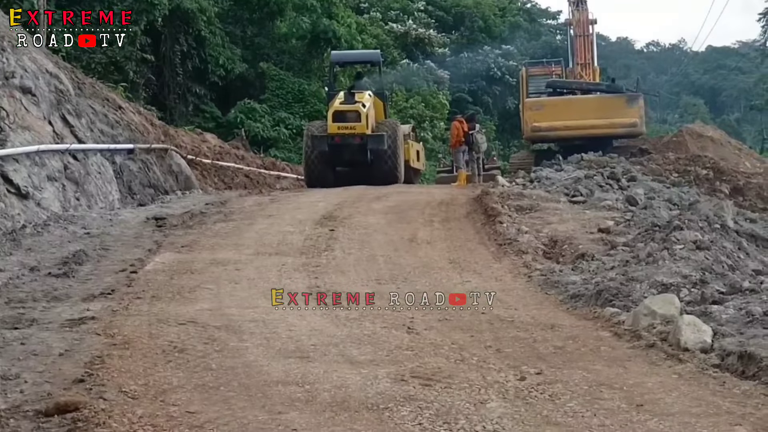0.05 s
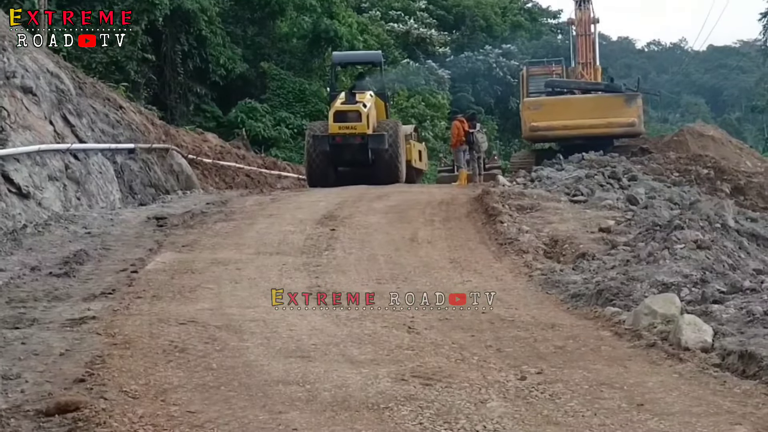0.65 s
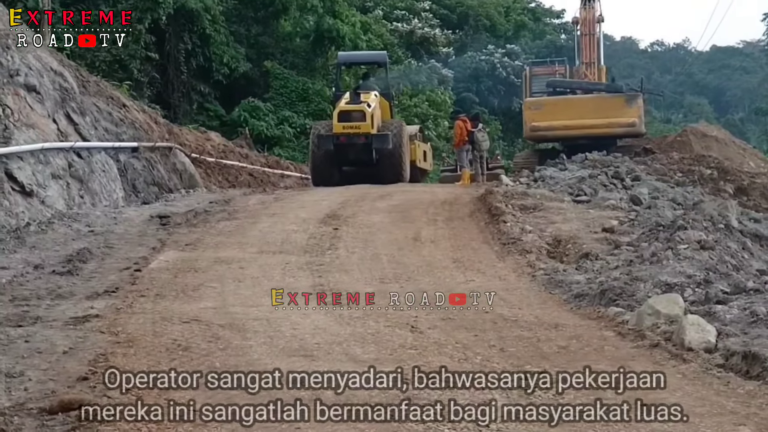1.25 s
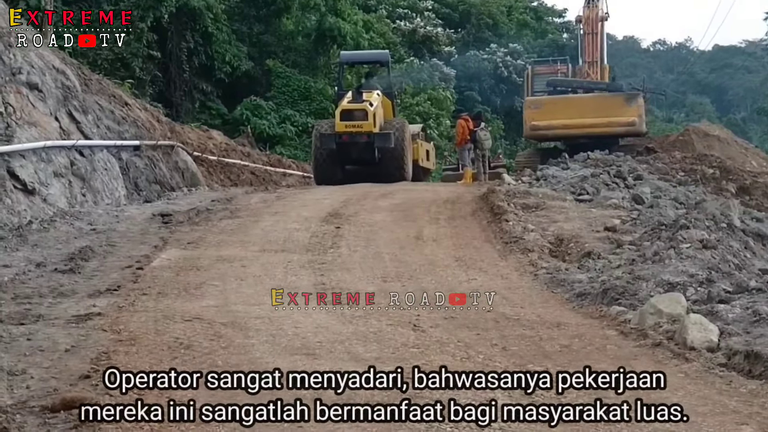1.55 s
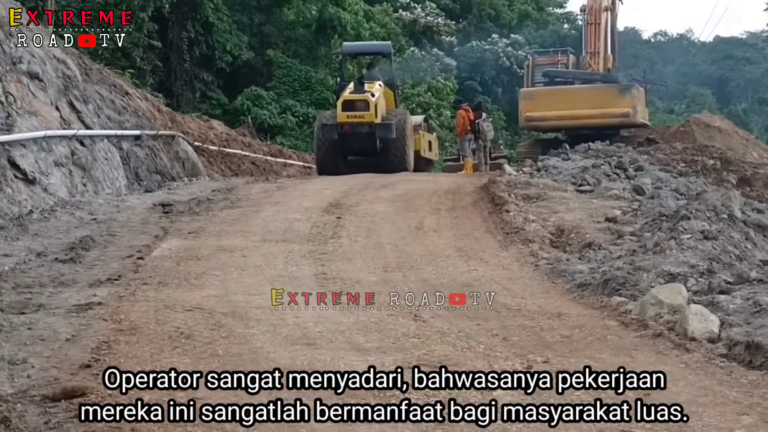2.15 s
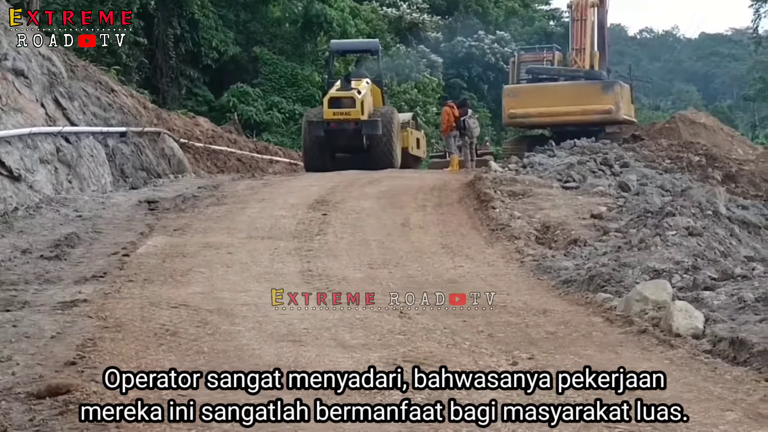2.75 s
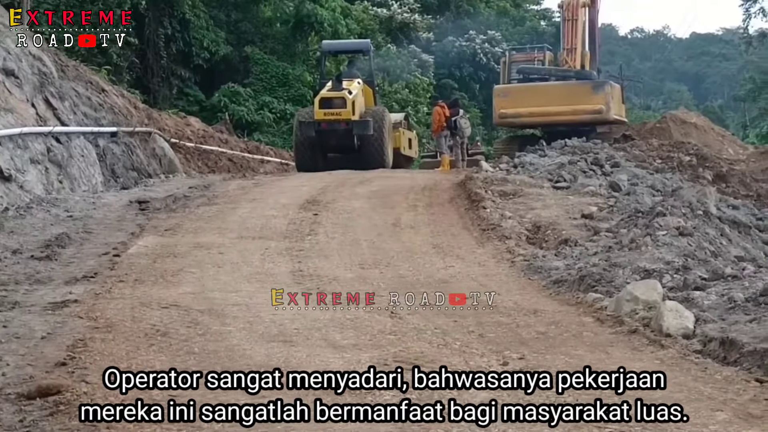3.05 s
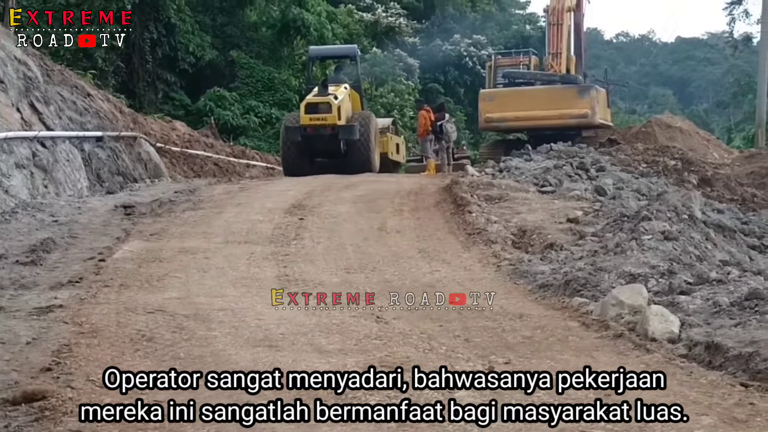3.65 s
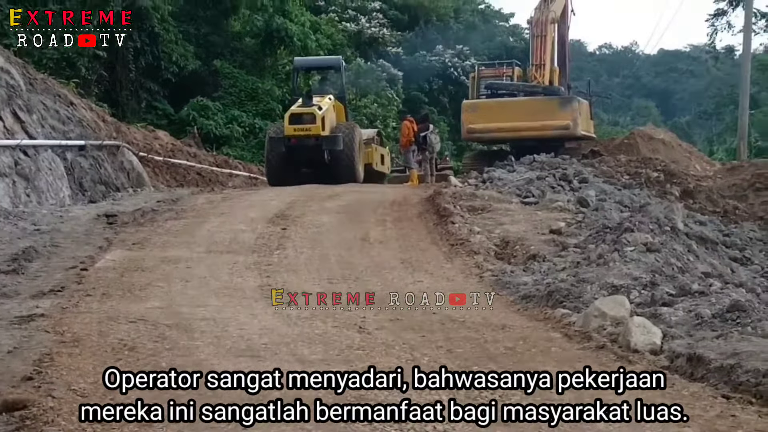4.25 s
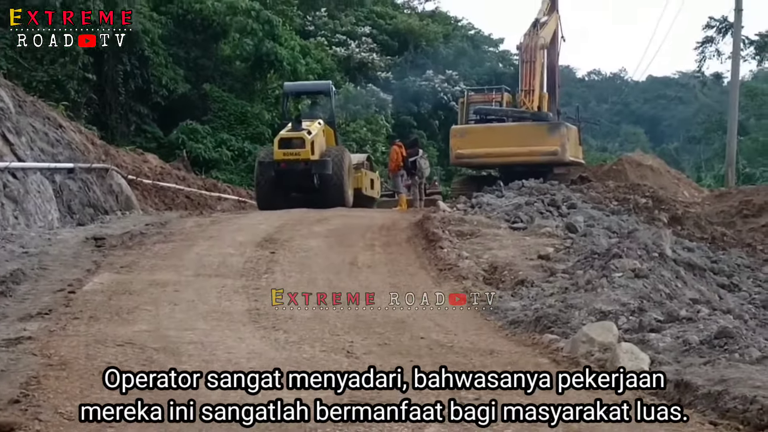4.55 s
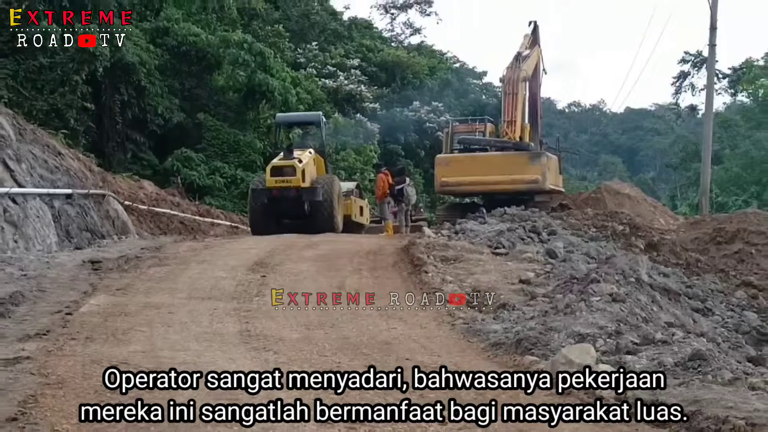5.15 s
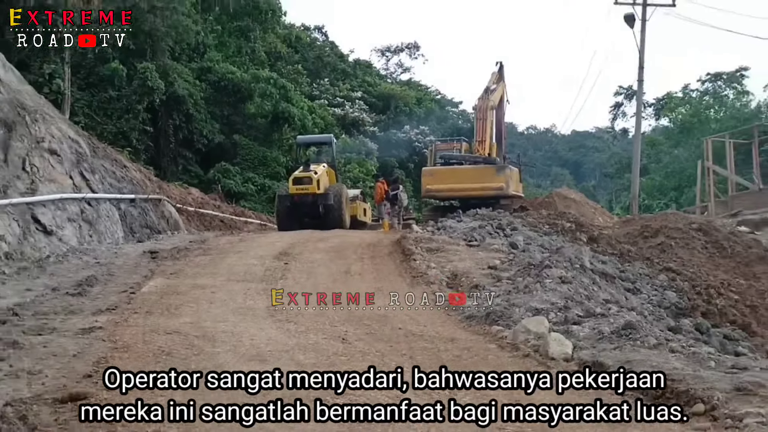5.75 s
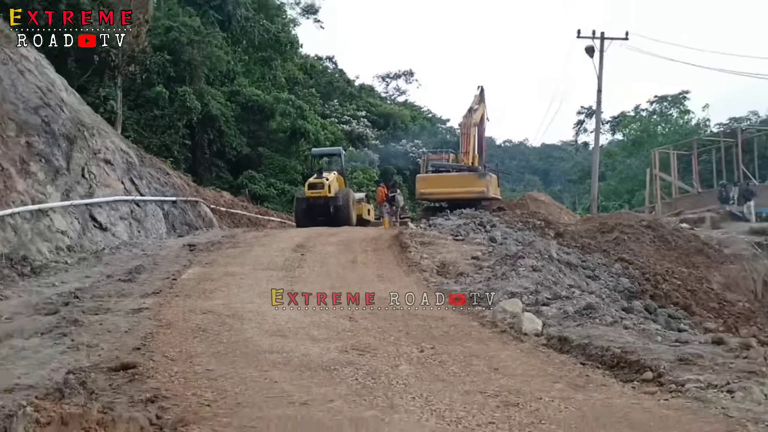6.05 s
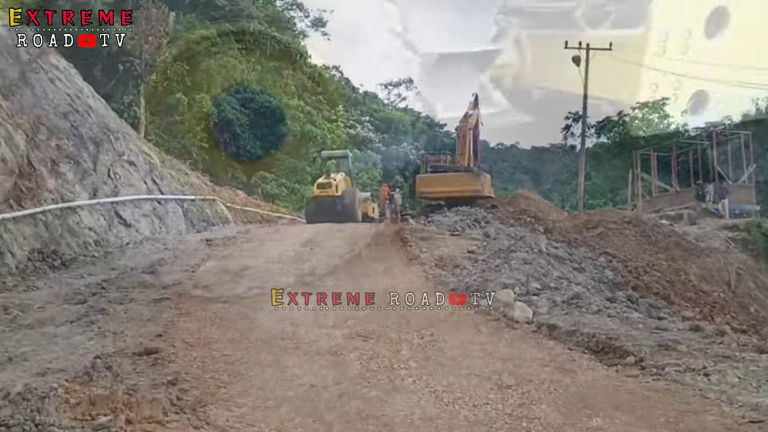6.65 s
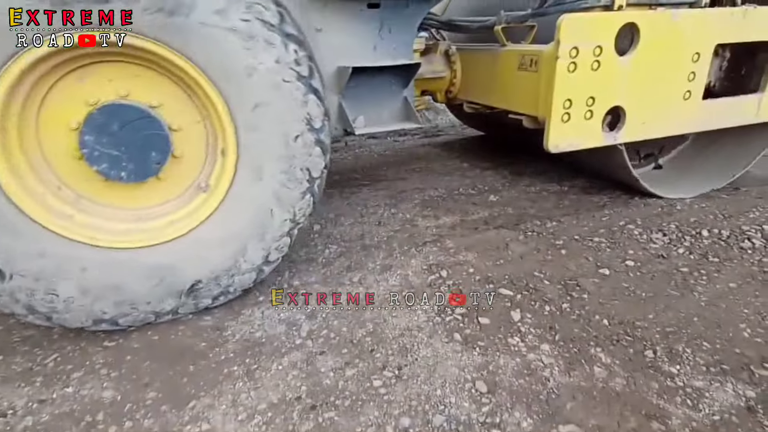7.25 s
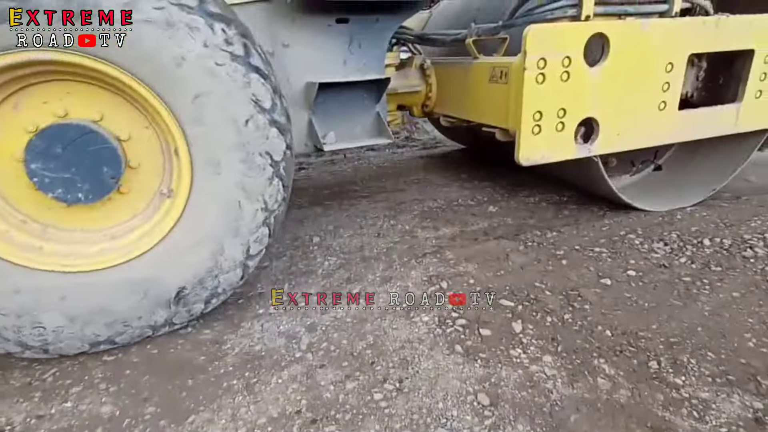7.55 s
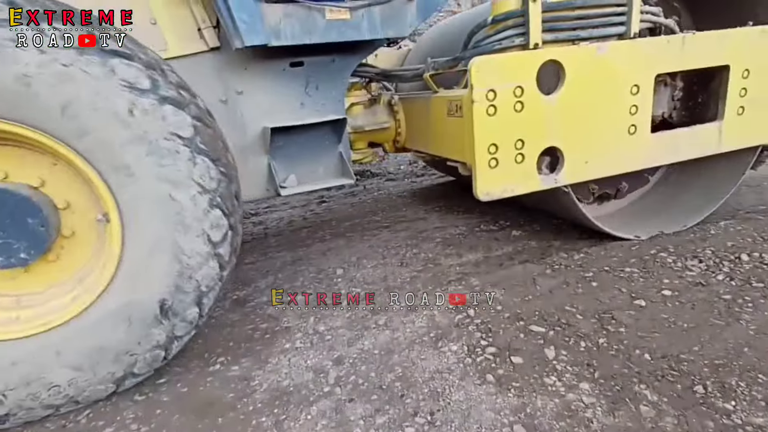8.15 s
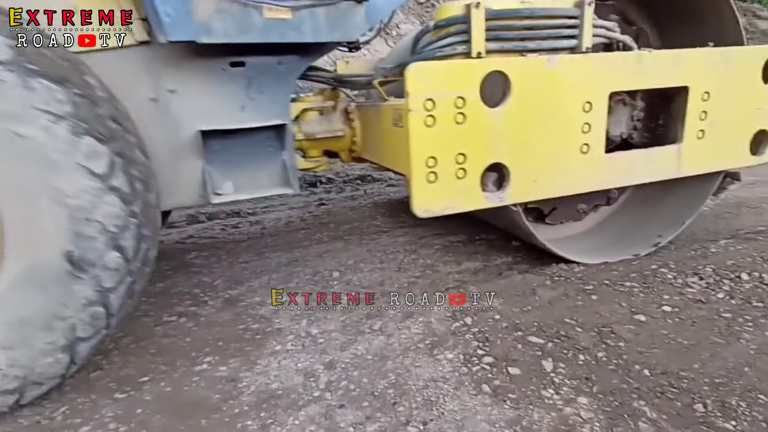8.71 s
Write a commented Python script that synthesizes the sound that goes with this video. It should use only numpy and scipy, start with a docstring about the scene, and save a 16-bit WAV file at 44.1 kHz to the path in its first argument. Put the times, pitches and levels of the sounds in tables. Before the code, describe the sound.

From the start, the diesel engines of a road roller and an excavator drone some way off outdoors, a low throbbing hum with light clatter that swells gently a few times in the first four seconds. Small metal clanks come at about 0.6 seconds and several times between 2.8 and 5.3 seconds. From around 3 seconds a light metallic rattle and faint insect trills join, with one insect chirping from roughly 3.8 to 6 seconds. A short dry snap comes near 5.9 seconds. Between about 6.4 and 7.2 seconds the distant sound dissolves into a much louder roller creeping past at arm's length. Its exhaust booms, its panels rumble and its engine clatters, with rushing cooling air, a soft gravel rasp and a faint, wandering high whistle. A dull thud lands near 8 seconds, and the engine stays loud until the end, near 9 seconds.

```python
"""Two diesels drone and beat some way up a dirt road: a four-cylinder roller and a six-cylinder excavator,
with scattered clanks and faint forest insects behind them. The scene dissolves to a steel-drum roller
passing at arm's length. Its periodic firings make the exhaust boom, the panels rumble and the block
clatter, while cooling air rushes, gravel rasps and a thin whistle wanders."""
import sys
import numpy as np
from scipy import signal
from scipy.fft import rfft, irfft, next_fast_len
from scipy.io import wavfile
from scipy.ndimage import uniform_filter1d

SR = 44100
rng = np.random.default_rng(int(sys.argv[2]) if len(sys.argv) > 2 else 0)


def file_out(sig):
    """Save sig as 16-bit WAV at sys.argv[1]."""
    # one column per channel
    cols = np.atleast_2d(sig).T
    # limit, then scale
    lim = np.clip(cols, -1, 1)
    pcm = np.round(lim * 32767).astype(np.int16)
    wavfile.write(sys.argv[1], SR, pcm)


N = 387182
TIME = np.arange(N) / SR

# insect trills (frequency [Hz], bandwidth [Hz], level [dB])
INSECT_TRILLS = [(4700, 120, -70), (6120, 60, -69), (6630, 30, -67)]
# one insect's chirps (time [s], level [dB])
INSECT_CHIRPS = [(3.776, -53), (3.925, -55.5), (4.075, -57.5), (4.22, -56), (4.37, -56.5), (4.515, -60),
                 (4.66, -60), (4.96, -55), (5.11, -54.5), (5.25, -57), (5.4, -52), (5.7, -58),
                 (5.98, -57.5)]

# engine speeds (time [s], firing rate [Hz])
FAR_ROLLER_FIRING = [(0, 56.55), (1.3, 56.53), (1.9, 56.38), (2.7, 55.98), (3.3, 56.25), (4.4, 56.4),
                     (5.2, 56.55), (5.9, 56.8), (6.8, 56.6)]
EXCAVATOR_FIRING = [(0, 82.88), (2.6, 82.98), (5.6, 83.0), (6.1, 83.3)]
CLOSE_FIRING = [(7.0, 63.12), (8.4, 63.22), (8.7, 63.45)]
# surges of the distant roller's overtones (start [s], end [s], boost [dB])
LOAD_SURGES = [(-.2, .95, 3.5), (1.55, 2.72, 6.3), (3.08, 3.95, 5)]
# its exhaust harmonics (order [x cycle rate], level [dB], gain with slowing [dB/Hz], surge share [1])
FAR_ROLLER_HARMONICS = [(4, -35.7, 0, 0), (8, -33.2, 2.6, .08), (10, -48.5, 0, 0), (12, -36.4, 0, .9),
                        (14, -46, 0, .2), (15, -47.5, 0, .3), (16, -45, 1.5, .7), (18, -51, 0, .2),
                        (20, -52.5, 2, .5), (25, -55, 0, 0), (32, -55, 0, 0)]
# excavator's exhaust and gear harmonics (order [x cycle rate], level [dB])
EXCAVATOR_HARMONICS = {6: -39, 9: -50, 12: -40.8, 36: -56, 54: -61, 84: -65, 98: -63, 110: -63.5, 115:
                       -59.5, 126: -60, 128: -65, 144: -61.5, 156: -66, 180: -65}
# noise spectra of the distant site (frequency [Hz], relative density [dB])
FAR_RUMBLE_SPECTRUM = [(20, -32), (40, -9), (60, 1), (100, 3), (140, 7), (165, 3.8), (200, 3), (245, -4),
                       (300, -6), (400, -18), (700, -43)]
FAR_CLATTER_SPECTRUM = [(150, -44), (330, -2.5), (540, 1.5), (700, -3.5), (950, -3), (1160, -7.5),
                        (1380, -4.5), (1800, -6.5), (2300, -11), (3200, -17), (7000, -25), (9000, -38.5)]
FAR_HISS_SPECTRUM = [(1000, 0.5), (3000, 3), (4700, 5.5), (6450, 7), (7000, -0.5), (8700, -11), (9500, -15),
                     (10200, -6), (11800, -6.5), (12800, -12), (14000, -29)]

# distant clanks (time [s], ring level [dB], plate level [dB], clack level [dB])
FAR_CLANKS = [(.625, -59, -48.5, -35.7), (2.765, -61, -54, -45), (3.266, -66, -53, -41.5),
              (3.758, -52.5, -45, -38), (4.246, -52.5, -41, -39.5), (5.305, -61, -56, -53)]
# resonances of every clank (frequency [Hz], bandwidth [Hz], decay [s])
CLANK_RING, CLANK_PLATE, CLANK_CLACK = (11350, 900, .03), (1760, 170, .045), (1100, 1500, .03)
# a dry snap (time [s], onset level [dB], frequency [Hz], bandwidth [Hz], decay [s])
DRY_SNAP = (5.8655, -31.3, 3900, 5600, .0018)
# a thud from the close roller (time [s], envelope peak [dB], frequency [Hz], length [s])
PANEL_THUD = (7.9535, -15.5, 400, .009)

# close roller's parts, by name (time abreast [s], nearest distance [m], level there [dB])
PASSING_PARTS = { "cooler": (7.44, 0.35, -40.5), "gears": (7.95, 1.3, -36.5), "block": (8.52, 1, -35.5),
                 "tyre": (8.36, 0.22, -42), "panels": (8, 1.66, -26.5), "exhaust": (8.6, 1.17, -23.5),
                 "drum": (7.8, 1.0, -47.5), }
# its whistle (time [s], frequency [Hz], level [dB])
WHISTLE_PATH = [(6.7, 8620, -65), (7.15, 8700, -68), (7.38, 9420, -66), (7.55, 9300, -62), (7.8, 8750, -62),
                (8.02, 8680, -64), (8.15, 9000, -64), (8.28, 9600, -64), (8.4, 10050, -59),
                (8.78, 10700, -58.5)]
# a brief sizzle of fine grit (start [s], rise [s], end [s], fall [s])
SIZZLE_ENVELOPE = (7.2, .55, 7.95, .15)
# close roller's harmonics (order [x cycle rate], relative level [dB])
GEAR_HARMONICS = {23: -38, 36: -50, 38: -48.5, 40: -50, 42: -46, 44: -47.5, 48: -42.5, 49: -49, 52: -51, 58:
                  -45.5, 108: -52, 110: -54, 156: -55}
CLOSE_EXHAUST_HARMONICS = {3: -48, 4: -24.7, 8: -41, 13: -45, 16: -34.8, 17: -35.8, 19: -41.5, 20: -42.5}
# its noise spectra (frequency [Hz], relative density [dB])
GRIT_SPECTRUM = [(3000, -2), (8000, -0.5), (9700, -2), (11000, 2.5), (12300, 4.5), (14000, -0.5)]
TYRE_SPECTRUM = [(1000, -20), (2000, -0.5), (2500, -1), (3200, 0.5), (3900, -15), (8000, -40)]
COOLER_SPECTRUM = [(2000, -23), (3650, 2), (4200, 0.5), (5000, 5), (5600, 2), (6300, 1.5), (7200, -10),
                   (8300, -31), (11000, -27)]
BLOCK_SPECTRUM = [(500, -2.5), (1220, 7), (1450, 5), (1720, 6), (2150, 1), (2480, 2.5), (3200, -4.5),
                  (4100, -6.5), (4700, -7.5), (7200, -11), (14000, -35)]
PANEL_SPECTRUM = [(20, -32), (60, -9), (120, -1.8), (175, -.7), (260, 0), (370, -4.5), (480, -10.5),
                  (550, -12), (640, -9), (770, -5), (830, -7.5), (880, -11), (1060, -12.5), (1170, -19),
                  (1600, -30), (8000, -70)]

CREEP_M_PER_S = 0.76


def undb(db):
    """Amplitude ratio: tenfold for every 20 dB."""
    return 10 ** (np.asarray(db) / 20)


def unit(x):
    """Normalisation to rms 1."""
    return x / np.sqrt(np.mean(x ** 2))


def curves(table):
    """Linear interpolation of each column over time."""
    times, *columns = np.transpose(table)
    return [np.interp(TIME, times, column) for column in columns]


def noise():
    """White noise: equal power per hertz."""
    return rng.standard_normal(N)


def drift(rate_hz):
    """Low-pass random fluctuation of spread near 1."""
    hold = max(int(SR / rate_hz), 1)
    steps = np.repeat(rng.standard_normal(N // hold + 1), hold)
    return 1.3 * uniform_filter1d(uniform_filter1d(steps, hold), hold)[:N]


def swell(start_s, rise_s, end_s, fall_s):
    """Trapezoidal envelope, silent outside start_s to end_s."""
    return np.clip(np.minimum((TIME - start_s) / rise_s, (end_s - TIME) / fall_s), 0, 1)


def fade_in(start_s, rise_s):
    """Linear amplitude ramp from 0 to 1."""
    return np.clip((TIME - start_s) / rise_s, 0, 1)


def bump(centre_s, length_s):
    """Raised-cosine envelope."""
    return np.cos(np.pi * np.clip((TIME - centre_s) / length_s, -.5, .5)) ** 2


def colour(x, spectrum):
    """Spectral shaping by a gain curve over log frequency; rms 1."""
    size = next_fast_len(N)
    hz, db = np.transpose(spectrum)
    bins = np.maximum(np.fft.rfftfreq(size, 1 / SR), 1)
    gain = undb(np.interp(np.log(bins), np.log(hz), db))
    return unit(irfft(rfft(x, size) * gain, size)[:N])


def resonate(x, hz, width_hz):
    """Two equal resonators in cascade, for steep skirts; rms 1."""
    b, a = signal.iirpeak(hz, hz / width_hz, fs=SR)
    return unit(signal.lfilter(b, a, signal.lfilter(b, a, x)))


def crank(firing_hz, hunt, cylinders):
    """Phase is the integral of rate: four-stroke cycles turned as the governor hunts a little."""
    return np.cumsum(firing_hz / cylinders * (1 + hunt * drift(6))) / SR


def harmonics(cycles, levels, waver_db):
    """Fourier series of the engine cycle; upper orders waver more on their way through the air."""
    out = 0
    for order, db in levels.items():
        exposure = min(order / 20, 1)
        phase = 2 * np.pi * order * cycles + 0.3 * exposure * drift(6)
        amplitude = np.sqrt(2) * undb(db + exposure * waver_db * drift(6.3))
        out = out + amplitude * np.cos(phase)
    return out


def knocks(cycles, repeat, depth, cylinders):
    """Cyclostationary noise: valves and injectors repeat each cycle, and each firing adds a burst."""
    samples_per_cycle = N / cycles[-1]
    repeating = noise()[(cycles % 1 * samples_per_cycle).astype(int)]
    bursts = 1 + depth * np.cos(2 * np.pi * cylinders * cycles)
    return bursts * (np.sqrt(repeat) * repeating + np.sqrt(1 - repeat) * noise())


def muffler(x, hz, width_hz):
    """All-pass dispersion: the chamber stores each pulse and lets it out late, smearing the chug."""
    return x - 2 * signal.lfilter(*signal.iirpeak(hz, hz / width_hz, fs=SR), x)


def passing(part):
    """Spherical spreading: a part's amplitude goes as 1 / distance while it creeps past."""
    abreast_s, nearest_m, db = PASSING_PARTS[part]
    distance_m = np.hypot(nearest_m, CREEP_M_PER_S * (TIME - abreast_s))
    return undb(db) * nearest_m / distance_m


def insects():
    """Narrow-band calls: one insect chirps on a rough pitch; others hold trills and a high buzz."""
    chirp_hz = 4690 * (1 + .013 * drift(400))
    tone = np.sqrt(2) * np.sin(2 * np.pi * np.cumsum(chirp_hz) / SR)
    chirps = tone * sum(undb(db) * bump(s, length_s=.06) for s, db in INSECT_CHIRPS)
    trills = sum(resonate(noise(), hz, width) * undb(db + 2.7 * drift(3.43))
                 for hz, width, db in INSECT_TRILLS)
    buzz = resonate(noise(), hz=10500, width_hz=3000) * undb(-63.3)
    return chirps + fade_in(start_s=2.4, rise_s=1.3) * (trills + buzz)


def distant_hiss():
    """Broadband noise of the site, its level fluttering slightly."""
    return colour(noise(), FAR_HISS_SPECTRUM) * undb(-49.5 + 0.82 * drift(25.06))


def loose_covers():
    """Randomly driven resonance: loose steel covers begin to rattle."""
    rattle = resonate(noise(), hz=1980, width_hz=900) * undb(-52.5 + 2.0 * drift(60))
    return rattle * fade_in(start_s=2.8, rise_s=.8)


def distant_diesels():
    """Beating: the roller's third firing harmonic lies a few hertz from the excavator's second."""
    firing_hz = curves(FAR_ROLLER_FIRING)[0]
    roller = crank(firing_hz, hunt=.0004, cylinders=4)
    excavator = crank(curves(EXCAVATOR_FIRING)[0], hunt=.0001, cylinders=6)
    # load drags the speed down and sharpens the pulses: overtones grow while the fundamental holds
    surge_db = sum(db * swell(start, 0.28, end, 0.31) for start, end, db in LOAD_SURGES)
    droop_hz = firing_hz.mean() - firing_hz
    levels = {order: db + per_hz * droop_hz + share * surge_db
              for order, db, per_hz, share in FAR_ROLLER_HARMONICS}
    exhausts = muffler(harmonics(roller, levels, waver_db=1.1), hz=169, width_hz=120)
    exhausts += harmonics(excavator, EXCAVATOR_HARMONICS, waver_db=1.6)
    chug = knocks(roller, repeat=0.1, depth=0.25, cylinders=4)
    rumble = colour(chug, FAR_RUMBLE_SPECTRUM) * undb(-35 + 0.16 * surge_db + 0.9 * drift(9))
    knocking = knocks(excavator, repeat=0.42, depth=0.07, cylinders=6)
    knocking += 0.91 * knocks(roller, repeat=0.3, depth=0.04, cylinders=4)
    clatter = colour(knocking, FAR_CLATTER_SPECTRUM) * undb(-40.5 + 0.51 * drift(14))
    return exhausts + rumble + clatter


def strike(start_s, db, hz, width_hz, decay_s):
    """Exponential decay of a noise burst in one resonance."""
    t = TIME[:SR // 4]
    ring = resonate(rng.standard_normal(len(t)), hz, width_hz)
    burst = undb(db) * ring * np.exp(-t / decay_s)
    return np.pad(burst, (int(start_s * SR), N))[:N]


def clanks():
    """Superposition of resonances: a bright ring, a ringing plate and a broad dull clack."""
    modes = CLANK_RING, CLANK_PLATE, CLANK_CLACK
    return sum(strike(s, db, *mode) for s, *levels in FAR_CLANKS for db, mode in zip(levels, modes))


def thud(centre_s, db, hz, length_s):
    """Heavy damping: a knocked panel swings only a few times."""
    return undb(db) * bump(centre_s, length_s) * np.sin(2 * np.pi * hz * (TIME - centre_s))


def whistle():
    """Frequency modulation: a breathy tone, likely the turbocharger, roughens as it spins up."""
    hz, db = curves(WHISTLE_PATH)
    jitter = np.interp(hz, [9300, 10200], [.013, .025])
    phase = 2 * np.pi * np.cumsum(hz * (1 + jitter * drift(700))) / SR
    return np.sqrt(2) * undb(db + 1.8 * drift(18)) * np.sin(phase)


def gravel():
    """Amplitude-modulated noise: grit hisses and sizzles at the drum, and rasps at the tyre."""
    crackle = noise() * undb(.8 * rng.exponential(size=N) + .7 * drift(20))
    grit = colour(crackle, GRIT_SPECTRUM) * passing("drum")
    sizzle = resonate(noise(), hz=12800, width_hz=2400) * undb(-54) * swell(*SIZZLE_ENVELOPE) ** 2
    rasp = colour(noise(), TYRE_SPECTRUM) * passing("tyre") * undb(1.3 * drift(150))
    return grit + sizzle + rasp


def cooling_air(cycles):
    """Flow noise: air rushes through the cooler, pulsing slightly at the firing rate."""
    flow = knocks(cycles, repeat=.05, depth=0.11, cylinders=4)
    return colour(flow, COOLER_SPECTRUM) * passing("cooler")


def block_and_panels(cycles):
    """Forced vibration: firings make the block clatter and the panels rumble."""
    block = colour(knocks(cycles, repeat=0.16, depth=0.086, cylinders=4), BLOCK_SPECTRUM)
    panels = colour(knocks(cycles, repeat=0.18, depth=0.031, cylinders=4), PANEL_SPECTRUM)
    return block * passing("block") + panels * passing("panels") * undb(0.4 * drift(10))


def close_roller():
    """Periodic excitation: one crank times the gear hum, exhaust boom, body noise and air pulses."""
    cycles = crank(curves(CLOSE_FIRING)[0], hunt=.001, cylinders=4)
    gears = unit(harmonics(cycles, GEAR_HARMONICS, waver_db=3)) * passing("gears")
    pulses = harmonics(cycles, CLOSE_EXHAUST_HARMONICS, waver_db=2.2)
    exhaust = unit(muffler(pulses, hz=265, width_hz=60)) * passing("exhaust")
    return cooling_air(cycles) + block_and_panels(cycles) + gears + exhaust


def scene():
    """Superposition with overlapping fades: the distant site dissolves into the close pass."""
    site = insects() + distant_hiss() + loose_covers() + distant_diesels()
    site *= swell(start_s=0, rise_s=.01, end_s=7.23, fall_s=0.99)
    impacts = clanks() + strike(*DRY_SNAP) + thud(*PANEL_THUD)
    close = (whistle() + gravel() + close_roller()) * fade_in(start_s=6.407, rise_s=0.68)
    return (site + impacts + close)[None]


def record(dry):
    """Band limiting: a steep elliptic low-pass removes the highest treble."""
    cutoff_hz = 13950
    return signal.sosfilt(signal.ellip(12, .1, 80, cutoff_hz, fs=SR, output="sos"), dry)


dry = scene()
out = record(dry)
file_out(out)
```